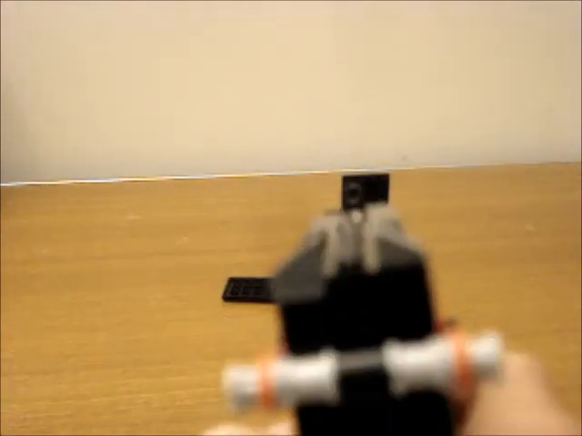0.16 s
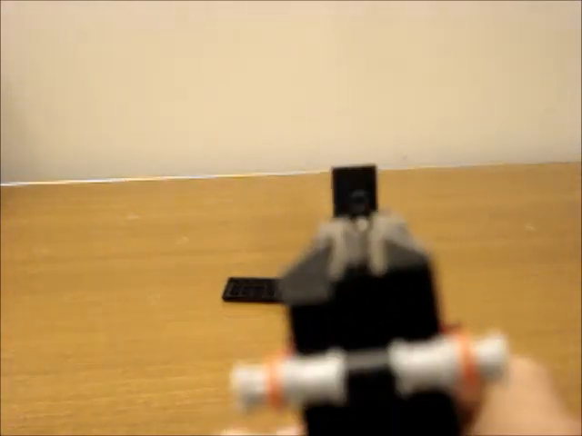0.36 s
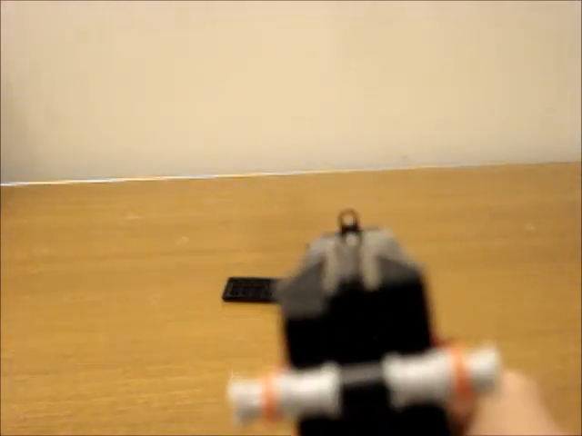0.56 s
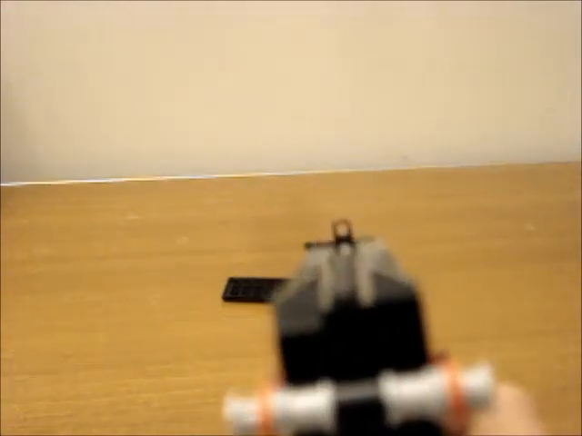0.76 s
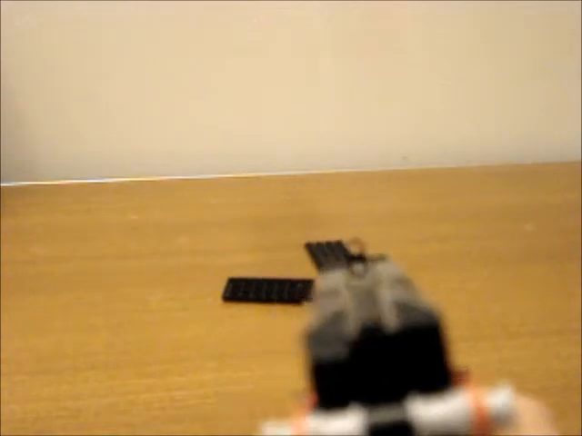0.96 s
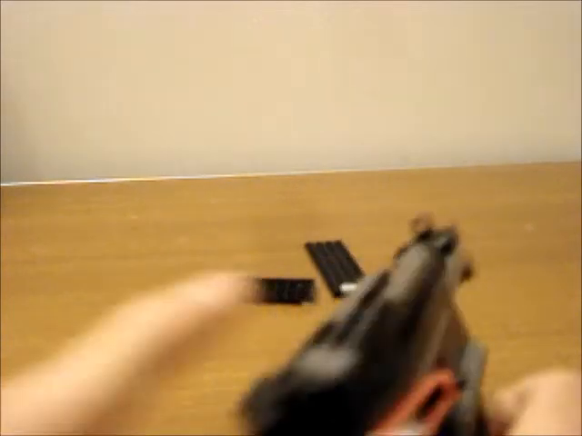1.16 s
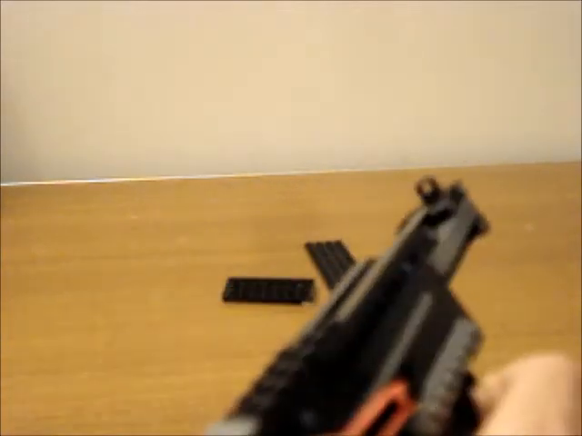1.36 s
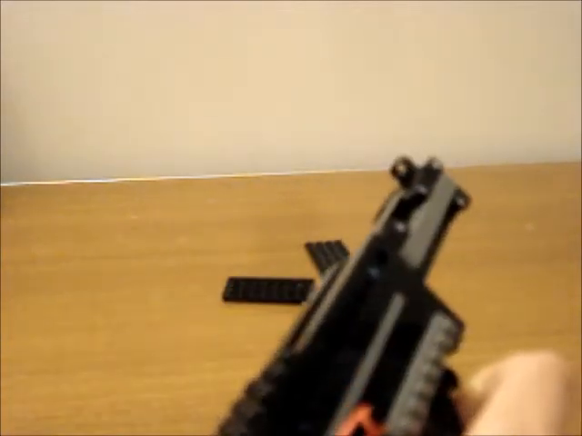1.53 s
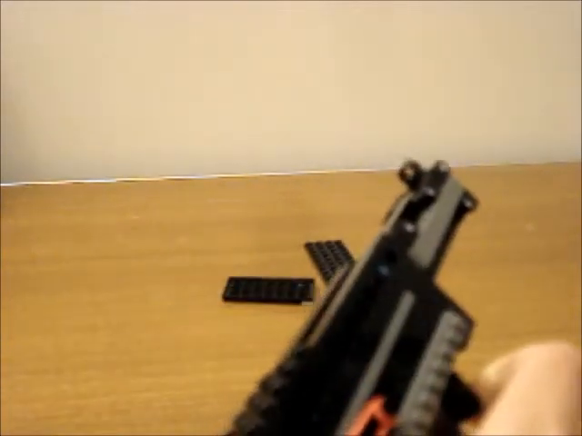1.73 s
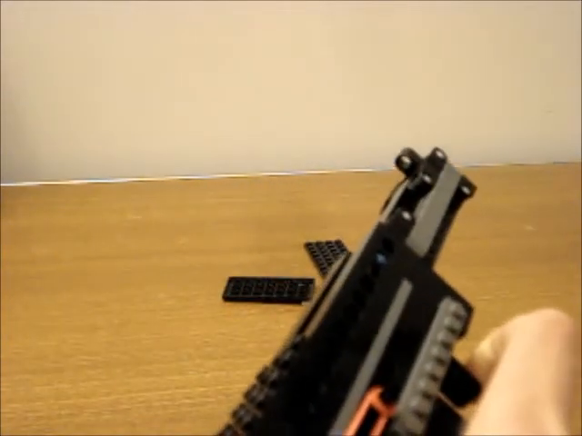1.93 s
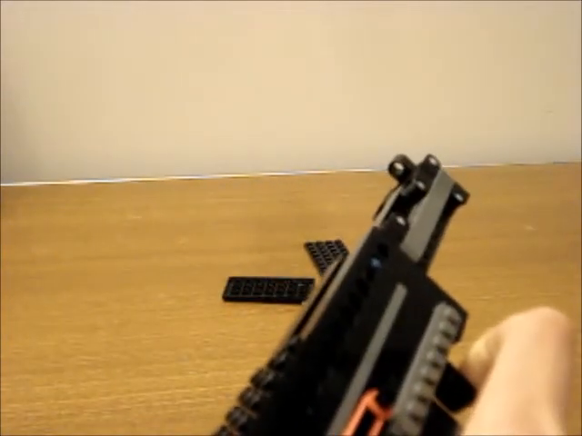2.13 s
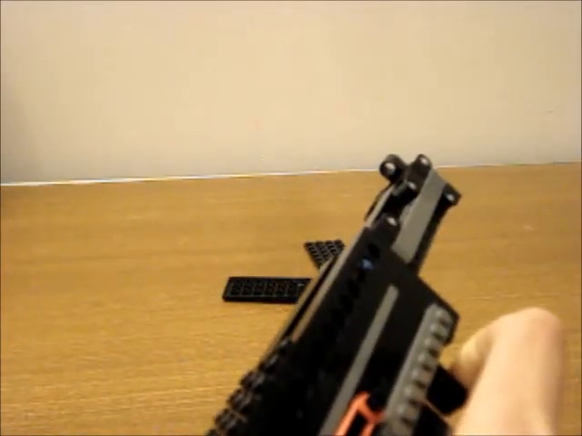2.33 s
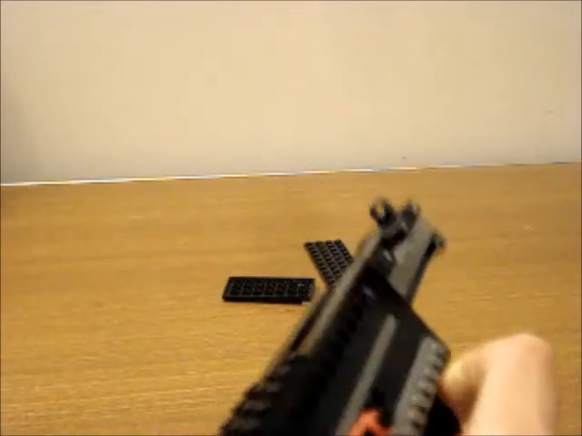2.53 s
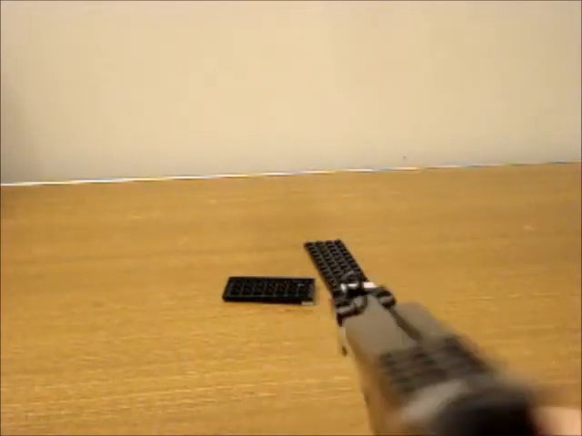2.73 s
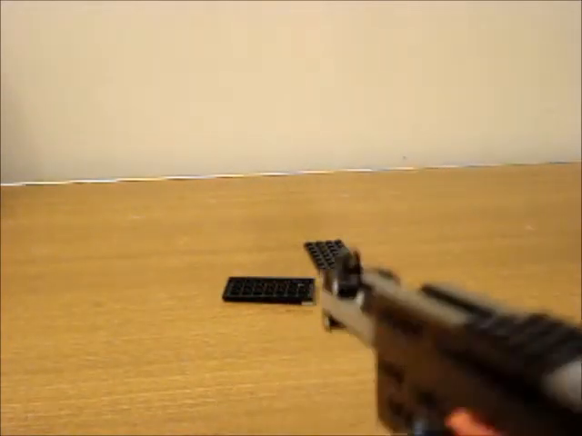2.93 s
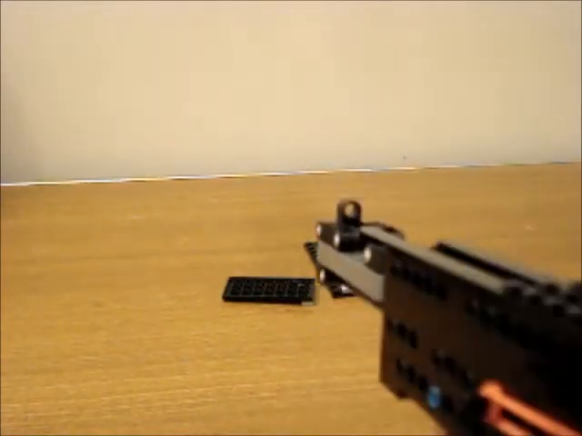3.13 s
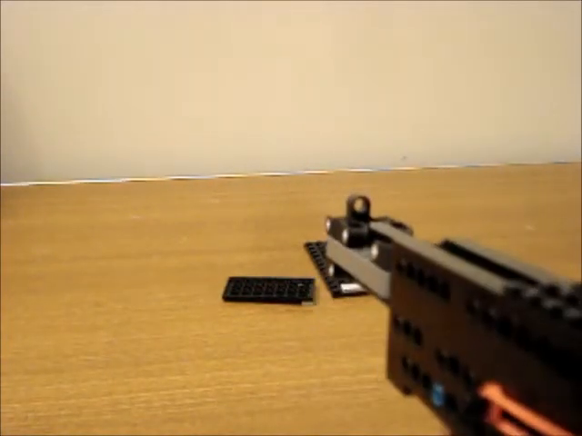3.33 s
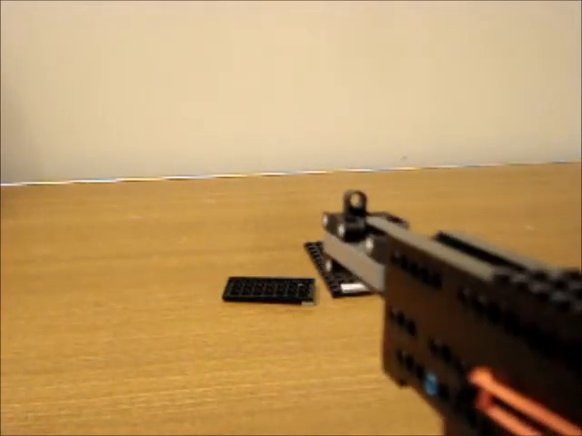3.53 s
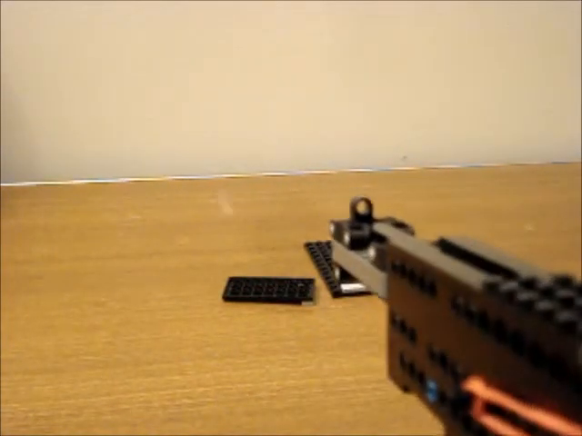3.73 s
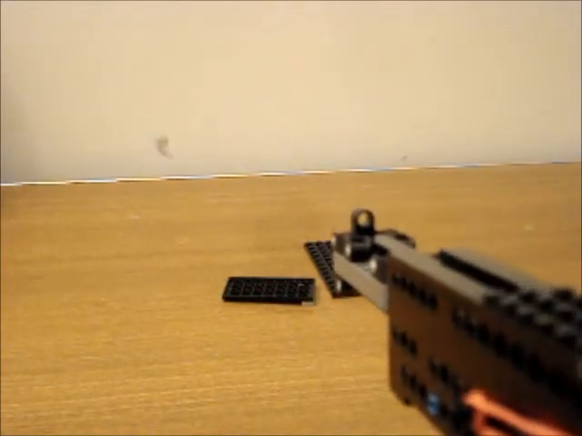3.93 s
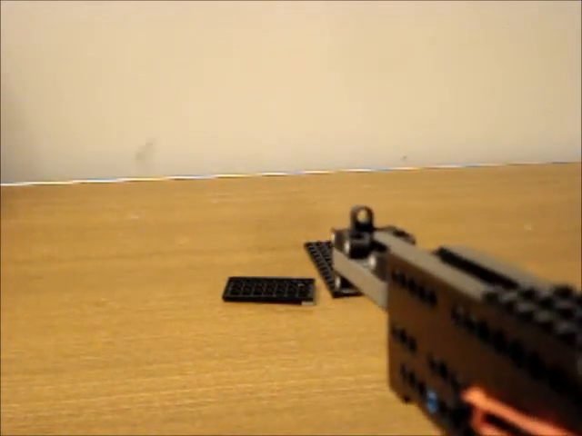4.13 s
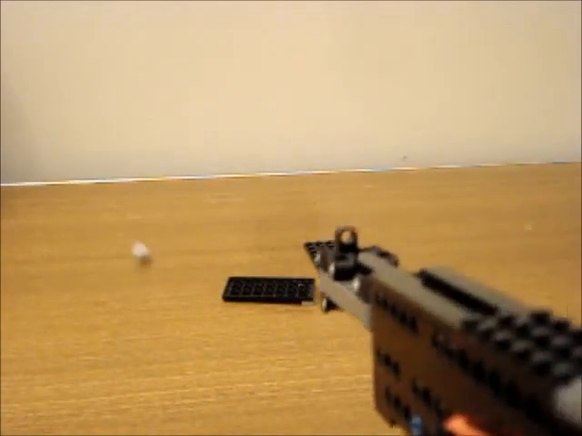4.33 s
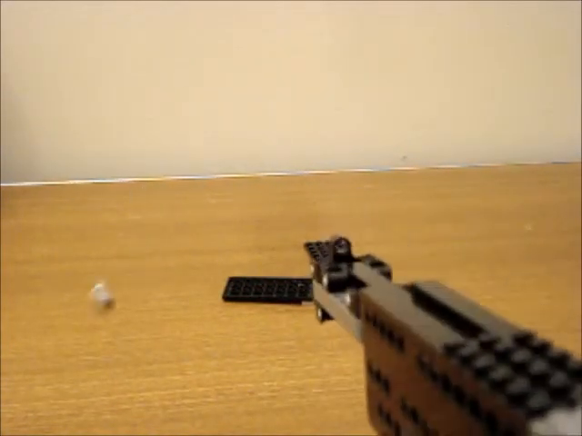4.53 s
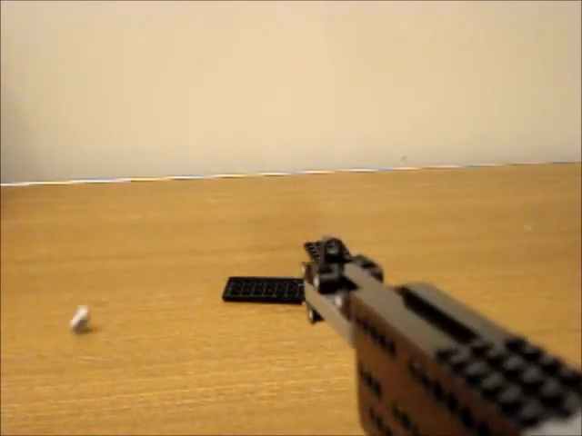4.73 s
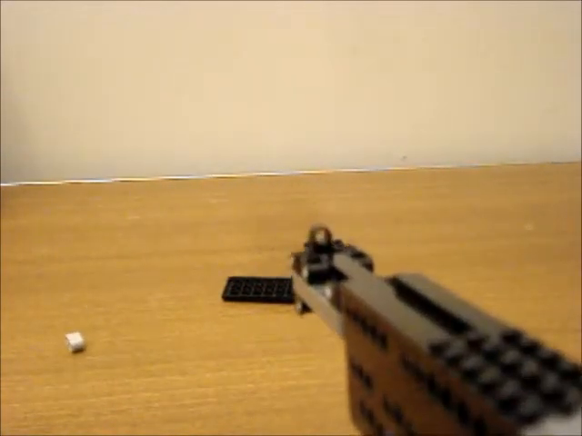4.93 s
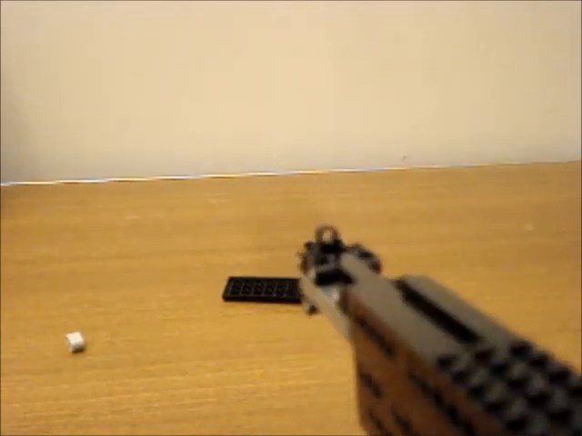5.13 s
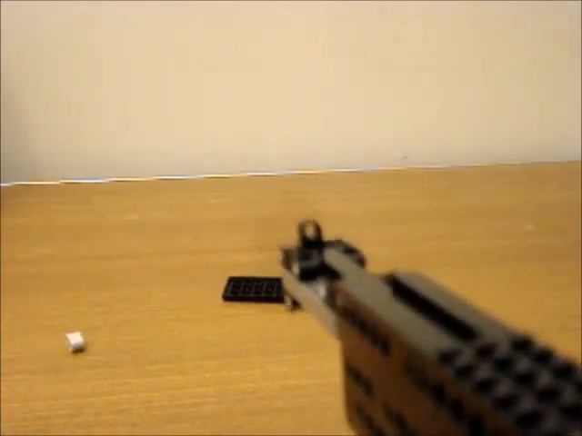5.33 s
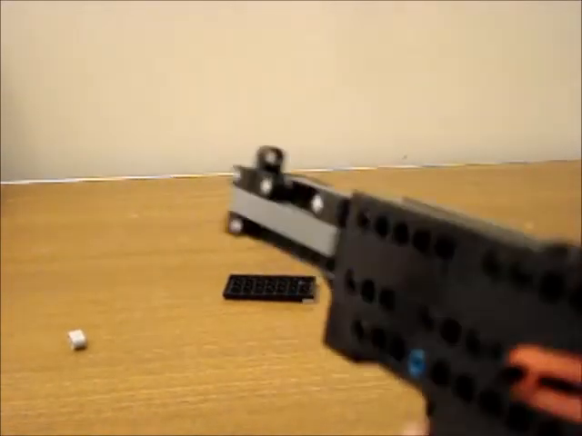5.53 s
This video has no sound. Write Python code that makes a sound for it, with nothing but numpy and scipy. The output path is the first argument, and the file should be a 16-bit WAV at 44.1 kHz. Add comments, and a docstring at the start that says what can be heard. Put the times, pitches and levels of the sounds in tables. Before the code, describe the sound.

Close to a small camera microphone in a bare room, a toy brick pistol fires with a rattling plastic snap. A struck plate clatters and slaps down loudly on a wooden table. Faint ticks follow, then a quick cocking clack, a dry trigger snap, and a second harder shot. A small brick bounces and raps the wall, tapping to rest over faint fan noise and hum.

```python
"""Toy brick pistol and falling plate

A toy pistol of plastic bricks fires twice and is cocked close to a small camera in a bare room.
A struck plate topples and clatters on a wooden table; later the small brick bounces to rest.
Each blow is a burst of noise that rings through the body of the thing that is hit.
Room tone and a mains hum, made of shaped noise and sine waves, lie under it.
The camera's gain control ducks after loud hits.
"""
import sys
import numpy as np
from scipy import signal
from scipy.io import wavfile
from scipy.ndimage import uniform_filter1d

SR = 44100
rng = np.random.default_rng(int(sys.argv[2]) if len(sys.argv) > 2 else 0)


def unload_wav(signal):
    """Save mono or channel-first audio to the path in sys.argv[1] as 16-bit WAV at rate SR, clipped to [-1, 1]."""
    wavfile.write(
        sys.argv[1],
        SR,
        np.round(np.clip(np.atleast_2d(signal).T, -1, 1) * 32767).astype(np.int16),
    )


def nominal_scale(level):
    """Amplitude ratio for a level in decibels (scalar or array-like)."""
    x = np.asarray(level, float) / 20
    return 10 ** x


N = 246456

# Levels of blows, tone and hum are before gain control. In all tables of blows, "bright" tilts the
# treble [dB per octave], f is the loudest region, "lift" raises it, "rattle" is set against the snap.

# broad colour of the room tone, only its shape counts: f/Hz, density/dB per Hz
TONE_COLOUR = [(20, -18), (60, -24.5), (100, -16.5), (200, -11.5), (400, -7), (700, -5.5), (1100, -7),
               (2100, -9), (2700, -15), (4500, -22), (9500, -33), (11000, -39)]
# fan whistles: f/Hz, width/Hz, level/dB
FAN_WHISTLES = [(638.6, 47, -53), (1091, 34, -58), (1922, 130, -53), (3930, 250, -62)]
# mains hum: f/Hz, level/dB
MAINS_HUM = [(120, -67.5), (240, -54.5)]
# how long the room takes to fade by 60 dB: f/Hz, t60/s
ROOM_DECAY = [(250, 0.38), (1000, 0.29), (3000, 0.33), (9000, .26)]
# a soft knock on the table: t/s, level/dB, f/Hz, t60/s
TABLE_KNOCK = [(3.005, -33.5, 257, 0.17)]

# bodies, two lists each: broad colour (f/Hz, level/dB) and modes (f/Hz, width/Hz, level/dB)
BRICK_BODY = [(200, -20), (700, -1), (990, -2.5), (1400, -5), (1990, -3.5), (2810, -1), (3980, -4),
              (5640, -3), (7980, -11), (11000, -22.5)], [(1256, 240, 1), (1860, 82, 0), (2820, 300, -25),
              (3250, 210, -15), (4730, 300, -35)]
PLATE_BODY = [(200, -15), (700, -1), (990, -2.5), (1400, -0.5), (1990, -6), (2810, -2), (3980, -4),
              (5640, -4.5), (7980, -9.5), (11000, -18.5)], [(1360, 360, -6.5), (2020, 84, 0.5),
              (2570, 110, 1), (4150, 180, -6), (5400, 320, -4)]
PISTOL_BODY = [(200, -29), (700, -19), (990, -10), (1400, -6.5), (1990, -1.5), (2810, 1), (3980, 1.5),
               (5640, 0.5), (7980, -6), (11000, -8.5)], [(1700, 210, -2), (3430, 470, -1.5),
               (5410, 150, 3.5), (7340, 660, 1)]

# the small brick bounces on the table: t/s, level/dB, bright/dB per octave, f/Hz, rattle/dB
BRICK_BOUNCES = [(3.7709, -16.5, 4.5, 1180, 2), (3.7983, -19.5, 0, 1350, -1.5),
                 (3.9661, -9.5, 3.5, 1720, -6), (4.2006, -13, 4, 3240, -6), (4.204, -9, 2, 1180, -7),
                 (4.365, -12.5, -1, 7980, -7), (4.4007, -18.5, 1, 830, -6.5),
                 (4.4725, -16.5, 2.5, 990, -15), (4.4857, -16, -0.5, 7980, -7),
                 (4.5567, -15, 1, 7980, -10.5), (4.6035, -17, -0.5, 830, -15), (4.6386, -18, 4, 990, -14),
                 (4.7367, -31.5, -3.5, 830, 2.5), (4.778, -25, 3, 830, -4), (4.828, -29.5, 2.5, 830, -1),
                 (4.8769, -32, 1, 1670, -3)]
# the brick raps the wall: t/s, level/dB, f/Hz, lift/dB
WALL_RAPS = [(3.8921, -9.5, 3300, 11), (3.9004, -11.5, 2380, 19)]
# the brick rocks to rest in tiny taps: t/s, level/dB, bright/dB per octave, f/Hz, lift/dB, rattle/dB
BRICK_ROCKING = [(4.64, -31.5, -0.5, 1010, 2, -1.5)]
# the plate is struck and topples: t/s, level/dB, bright/dB per octave, f/Hz, rattle/dB
PLATE_BLOWS = [(0.3014, -8.5, 3.5, 2870, 1.5), (0.324, -20, -10, 1180, -26), (0.3543, -8, -3, 5640, -13),
               (0.492, -10, 0, 1150, -8), (0.5819, -13, 0.5, 980, -13), (0.7875, -10, 1.5, 3350, -10),
               (0.7915, -11, -2, 3380, -25), (0.8592, -31, -1, 4000, 6.5), (0.8705, -15, 1.5, 4740, -9),
               (0.9317, -16.5, 0, 810, -8.5), (0.938, -20, 0, 4770, -3), (0.98, -22, 0, 8100, -4.5),
               (1.02, -19, 4, 830, -6.5), (1.047, -27.5, 14, 7000, -12.5)]
# the plate slaps down flat: t/s, level/dB, f/Hz, lift/dB
PLATE_SLAPS = [(0.6085, 4, 1750, 3), (0.6182, -2.5, 1660, 7.5), (0.6362, 0, 1490, 12)]
# the plate chatters as it settles: t/s, level/dB, bright/dB per octave, f/Hz, lift/dB, rattle/dB
PLATE_WOBBLE = [(0.94, -35.5, 0.37, 4650, 1.2, 3.1)]
# the slide shoots along its rails: t/s, level/dB
SLIDE_STROKES = [(0.1507, -6.5), (2.0953, -18), (3.6102, 0)]
# the same for all slide strokes: bright/dB per octave, f/Hz, lift/dB, rattle/dB
SLIDE_COLOUR = (-0.5, 5551, 5, -10)
# catch and stops inside the pistol: t/s, level/dB, bright/dB per octave, f/Hz, rattle/dB
CLACKS = [(0.1612, -13.5, 1.5, 860, -16), (0.1747, -9, -3.5, 1970, -5), (0.1803, -7, 3.5, 1670, -13),
          (0.1962, -7.5, 5, 1170, 2), (2.086, -17, 1.5, 3600, -8), (2.0978, -9, -1, 3500, -9),
          (2.1206, -12.5, -3.5, 5000, -17), (2.1244, -16.5, -5.5, 5640, -18), (3.6327, -13, 4, 1670, -3),
          (3.6424, 2, 14.5, 5400, -4), (3.6668, -17, -5, 1990, -12)]
# the trigger snaps back dry: t/s, level/dB, f/Hz, lift/dB
TRIGGER_SNAPS = [(2.4758, -4.5, 2770, 4), (2.4848, -12.5, 3700, 8)]
# loose parts tick faintly as the hand shifts: t/s, level/dB, f/Hz, lift/dB
LOOSE_TICKS = [(1.3345, -33, 5500, 6), (1.3404, -25, 2280, 6), (2.251, -26, 3500, 0),
               (1.5776, -20, 2250, 9), (1.6195, -26, 3400, 16), (1.6817, -30.5, 6500, 10),
               (2.3356, -28, 3950, 12), (2.36, -30.5, 4000, 7), (2.6832, -32, 8300, 6),
               (3.114, -33.5, 6800, 4), (5.317, -32.5, 3250, 11), (5.358, -33.5, 8700, 13)]

# sharp cracks that jolt the microphone: t/s, height (full scale 1, before the treble cut)
MIC_CRACKS = [(0.1651, -0.47), (0.6084, -0.55), (3.6228, -0.22)]
# the microphone's rest level jumps and sags back slowly: t/s, height before the sag (full scale 1)
SLOW_JOLTS = [(.153, 0.046), (.303, -.007), (.613, 0.00087), (2.097, .013), (3.61, 0.03)]
# the same, sagging back quickly: t/s, height before the sag (full scale 1)
QUICK_JOLTS = [(.164, -0.084), (.612, -.005), (3.622, -0.063), (3.641, -0.019), (3.774, -0.035)]


def evened(x):
    """Scales a signal to an average strength (rms) of 1."""
    return x / np.sqrt(np.mean(x ** 2) + 1e-20)


def read(points, hz):
    """Reads a curve by straight lines on a log-frequency axis."""
    f, value = np.transpose(points)
    return np.interp(np.log(hz + 1), np.log(f + 1), value)


def add(mix, s, sound):
    """Mixes a sound in at s seconds."""
    part = mix[round(s * SR):][:len(sound)]
    part += sound[:len(part)]


def causal(gain):
    """Turns a loudness-by-frequency curve into a ring that starts at once (minimum phase)."""
    mirrored = np.r_[gain, gain[-2:0:-1]]
    log_gain = np.log(np.maximum(mirrored, 1e-5))
    spectrum = np.exp(np.conj(signal.hilbert(log_gain)))
    return np.fft.ifft(spectrum).real[:len(gain)]


def lifted(table, lift_db):
    """Gives all rows the same lift."""
    return [(s, db, bright, hz, lift_db, rattle) for s, db, bright, hz, rattle in table]


def tinted(table, bright_db, rattle_db):
    """Gives all rows the same brightness and rattle."""
    return [(s, db, bright_db, hz, lift, rattle_db) for s, db, hz, lift in table]


def body_ring(body, bright_db, loud_hz, lift_db):
    """A body rings with its broad colour and its modes; each blow wakes the modes unevenly."""
    colour, modes = body
    hz = np.fft.rfftfreq(4096, 1 / SR)
    power = nominal_scale(2 * read(colour, hz))
    for f, width, mode_db in modes:
        shift, strength = rng.standard_normal(2)  # grip and contact point differ from blow to blow
        detuning = 2 * (hz - f * (1 + 0.02 * shift)) / width
        power += nominal_scale(2 * (mode_db + 1.5 * strength)) / (1 + detuning ** 2)
    slope_db = bright_db * np.log2((np.maximum(hz, 700) + 300) / 3000)
    octaves_away = np.log2((hz + 1) / loud_hz)
    region_db = lift_db * np.exp(-(octaves_away / 0.45) ** 2)
    return causal(np.sqrt(power) * nominal_scale(slope_db + region_db))


def contact_force(clicks_per_s, t60, hold, rattle_db):
    """A contact is a short snap and a rattle of small scrapes that lasts hold s, then dies."""
    t = np.arange(SR // 3) / SR
    click_heights = nominal_scale(3 * np.minimum(rng.exponential(1, len(t)), 4))
    clicks = (rng.random(len(t)) < clicks_per_s / SR) * click_heights
    scrapes = signal.lfilter([1], [1, -np.exp(-1 / (0.0008 * SR))], clicks)
    rattle = evened(scrapes) * nominal_scale(rattle_db - 60 * np.maximum(t - hold, 0) / t60)
    snap = 0.51 * t / 0.0013 * np.exp(1 - t / 0.0017)  # strongest after 1.7 ms
    force = (snap + rattle * np.minimum(t / 0.00095, 1)) * rng.standard_normal(len(t))
    force[round(0.0007 * SR)] -= 3.5  # the first contact is one clean impulse
    return force


def hits(table, body, clicks_per_s, t60, hold=0):
    """Each blow is a contact force that sets the body ringing."""
    out = np.zeros(N)
    for s, db, bright_db, loud_hz, lift_db, rattle_db in table:
        ring = body_ring(body, bright_db, loud_hz, lift_db)
        force = contact_force(clicks_per_s, t60, hold, rattle_db)
        blow = signal.fftconvolve(force, ring)
        add(out, s, nominal_scale(db) * blow / np.linalg.norm(ring) / 2)
    return out


def mains_hum():
    """Sine waves whose loudness wavers slowly together."""
    t = np.arange(N) / SR
    drift = uniform_filter1d(rng.standard_normal(N), 3000)
    waver_db = 0.8 * evened(uniform_filter1d(drift, 3000))
    return sum(nominal_scale(db + waver_db) * np.sqrt(2) * np.sin(2 * np.pi * f * t) for f, db in MAINS_HUM)


def room_tone():
    """Broad noise with faint patches and a few fuzzy fan whistles, built as a spectrum over time."""
    frames, hz = N // 512 + 5, np.fft.rfftfreq(2048, 1 / SR)
    real, imaginary, patches = rng.standard_normal((frames, len(hz), 3)).T
    patches = uniform_filter1d(patches, 20, 0)  # smooth over frequency, then over time
    patches_db = 1.13 * evened(uniform_filter1d(patches, 5, 1))
    power = nominal_scale(2 * read(TONE_COLOUR, hz))
    power *= nominal_scale(2 * -42) / power.sum()  # the broad part lies at -42 dB
    for f, width, db in FAN_WHISTLES:
        band = 1 / (1 + (2 * (hz - f) / width) ** 2) ** 2
        power += nominal_scale(2 * db) * band / band.sum()
    spectrum = (real + 1j * imaginary) * np.sqrt(power)[:, None] * nominal_scale(patches_db)
    noise = signal.istft(spectrum, nperseg=2048, noverlap=1536)[1]
    return np.sqrt(power.sum()) * evened(noise[:N])


def room_reflections(x):
    """Dense echoes die band by band; three tails take turns so that like hits do not ring alike."""
    turn = np.arange(N) / SR * 2 * np.pi * 1.7
    out = np.zeros(N)
    for k in range(3):
        hz, t, z = signal.stft(rng.standard_normal(SR // 2), SR, nperseg=128)
        fade = nominal_scale(-60 * t / read(ROOM_DECAY, hz)[:, None])
        tail = signal.istft(z * fade, SR, nperseg=128)[1]
        tail *= np.clip(np.arange(len(tail)) / SR / 0.0029 - 0.4, 0, 1)  # starts about 1 ms late
        share = np.sqrt(2 / 3) * np.cos(turn + k * np.pi / 3)
        out += signal.fftconvolve(x * share, tail / np.linalg.norm(tail))[:N]
    return out


def knock():
    """A dull puff of noise in the table top's low resonance."""
    s, db, hz, t60 = TABLE_KNOCK[0]
    t, out = np.arange(SR // 4) / SR, np.zeros(N)
    resonance = signal.butter(2, [hz * 0.73, hz * 2], "bandpass", fs=SR)
    wood = signal.lfilter(*resonance, rng.standard_normal(len(t)))
    add(out, s, nominal_scale(db - 60 * t / t60) * np.minimum(t / 0.0066, 1) * evened(wood))
    return out


def brick():
    """The small brick bounces on the table and raps the wall, then rocks in a blur of tiny taps."""
    rows = lifted(BRICK_BOUNCES, 3.5) + tinted(WALL_RAPS, bright_db=-0.5, rattle_db=-6)
    return (hits(rows, BRICK_BODY, clicks_per_s=700, t60=0.13)
            + hits(BRICK_ROCKING, BRICK_BODY, clicks_per_s=250, t60=0.53, hold=0.051))


def plate():
    """The plate is struck, hits the table and slaps down flat, then chatters as it settles."""
    rows = lifted(PLATE_BLOWS, 4.5) + tinted(PLATE_SLAPS, bright_db=-1.5, rattle_db=-19.5)
    return (hits(rows, PLATE_BODY, clicks_per_s=700, t60=0.14)
            + hits(PLATE_WOBBLE, PLATE_BODY, clicks_per_s=700, t60=0.18, hold=0.13))


def pistol():
    """Rattling slide strokes, clacks inside, trigger and faint ticks all ring through one body."""
    slide = [row + SLIDE_COLOUR for row in SLIDE_STROKES]
    rows = (lifted(CLACKS, 4.5)
            + tinted(TRIGGER_SNAPS, bright_db=-2.5, rattle_db=-31)
            + tinted(LOOSE_TICKS, bright_db=-3.5, rattle_db=-20.5))
    return (hits(slide, PISTOL_BODY, clicks_per_s=1500, t60=0.08, hold=0.058)
            + hits(rows, PISTOL_BODY, clicks_per_s=3600, t60=0.073))


def scene():
    """Near hits, their room tail and the steady room."""
    near = pistol() + plate() + brick()
    return (near + nominal_scale(-3.5) * room_reflections(near) + knock() + room_tone() + mains_hum())[None]


def microphone_jolts():
    """One-sided cracks about a tenth of a millisecond wide, and steps that sag back."""
    t, out = np.arange(N) / SR, np.zeros(N)
    for s, height in MIC_CRACKS:
        out += height * np.exp(-np.minimum(((t - s) / 0.00007) ** 2, 50))
    for table, sag_s in ((SLOW_JOLTS, 0.033), (QUICK_JOLTS, 0.0034)):
        for s, height in table:
            after = np.maximum(t - s, 0)
            out += height * np.exp(-after / sag_s) * np.minimum(after / 0.0024, 1)
    return out


def held_over(x, attack_s, fall_db, knee_db):
    """dB above the knee: smoothed power whose peak is held and sinks fall_db a second."""
    smooth = np.exp(-1 / (attack_s * SR))
    power = signal.lfilter([1 - smooth], [1, -smooth], x ** 2)
    power_db = 10 * np.log10(power + 1e-12)
    fall = np.arange(N) / SR * fall_db
    held_db = np.maximum.accumulate(power_db + fall) - fall
    return np.maximum(held_db - knee_db, 0)


def band_limit(x):
    """A steep low-pass at the top of the band."""
    return signal.sosfilt(signal.butter(12, 11120, fs=SR, output="sos"), x)


def record(dry):
    """Gain control ducks bursts, with a memory for long clatter, then peaks; jolts and a treble cut."""
    burst_db = held_over(dry[0], attack_s=0.23, fall_db=28.5, knee_db=-36.5)
    forget = np.exp(-1 / (0.55 * SR))
    memory_db = signal.lfilter([1 - forget], [1, -forget], burst_db)
    ducked = dry / nominal_scale(0.37 * burst_db + 0.2 * memory_db)
    peak_db = held_over(ducked[0], attack_s=0.0039, fall_db=152.0, knee_db=-23)
    limited = ducked / nominal_scale(0.36 * peak_db)
    rounded = 0.4 * np.tanh(limited / 0.4)  # the input stage rounds the first spike
    treble_cut = signal.firwin(301, 10030, window=("kaiser", 6), fs=SR)  # low-pass at 10030 Hz
    mix = signal.oaconvolve(rounded + microphone_jolts(), treble_cut[None], "same")
    return band_limit(mix)


dry = scene()
out = record(dry)
unload_wav(out)
```